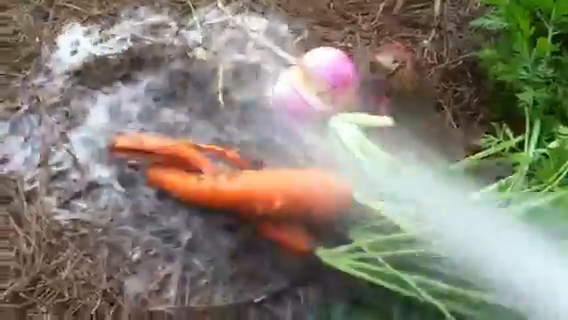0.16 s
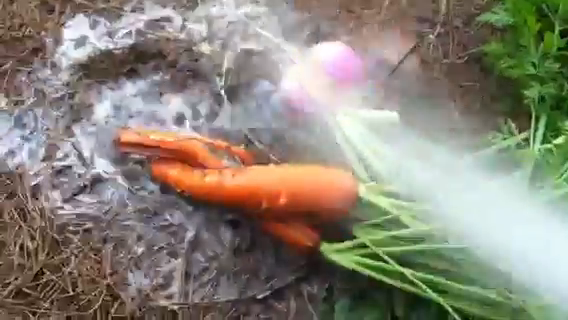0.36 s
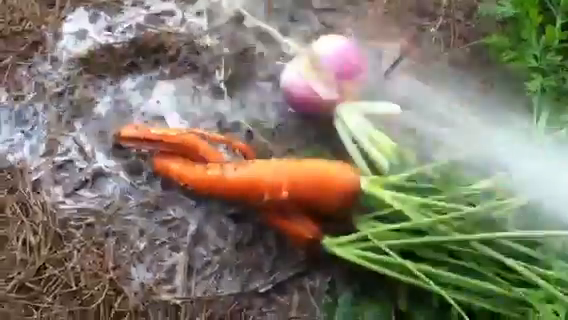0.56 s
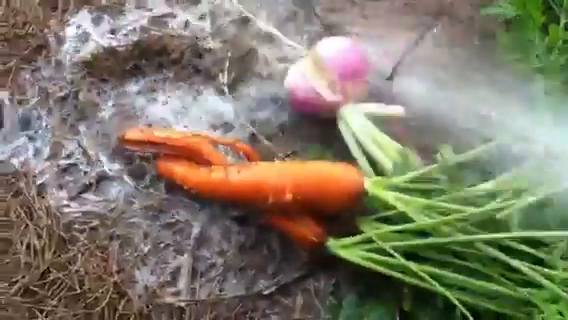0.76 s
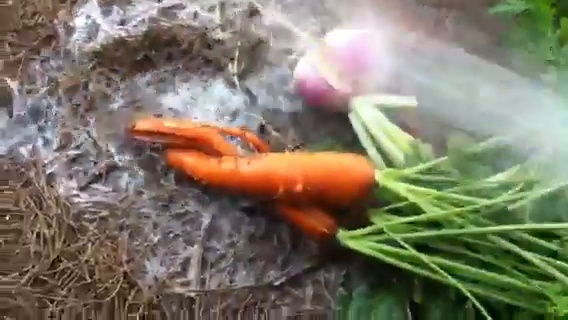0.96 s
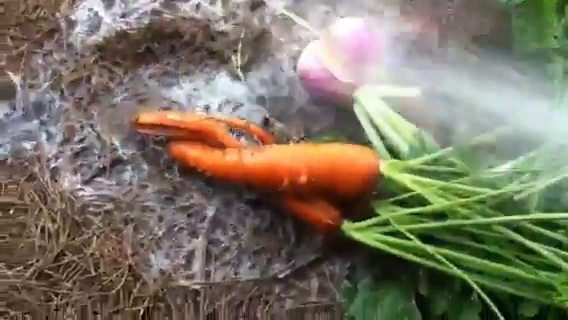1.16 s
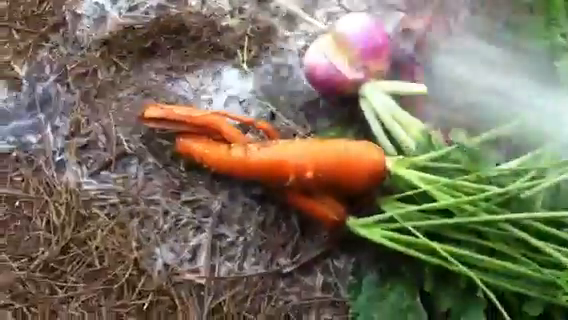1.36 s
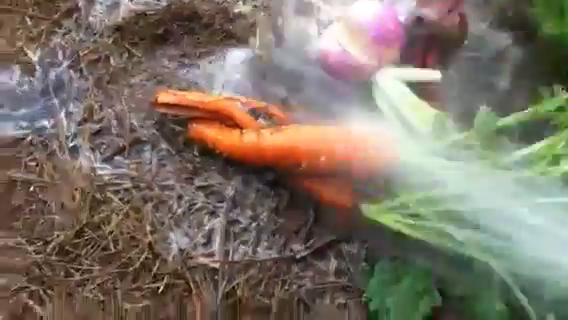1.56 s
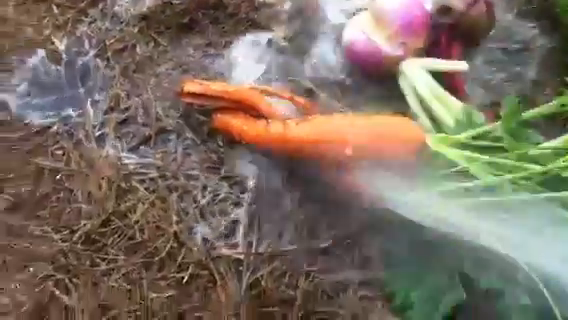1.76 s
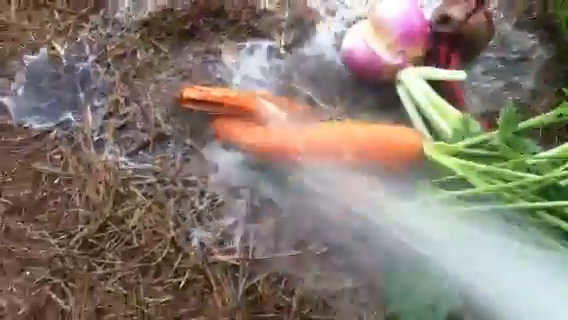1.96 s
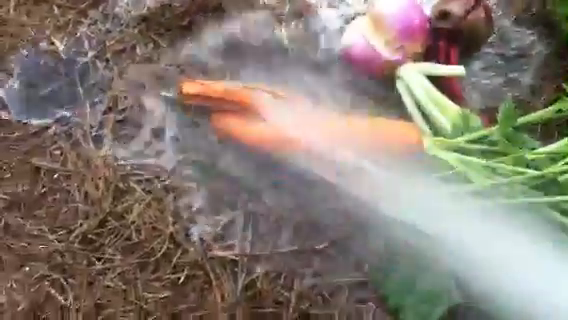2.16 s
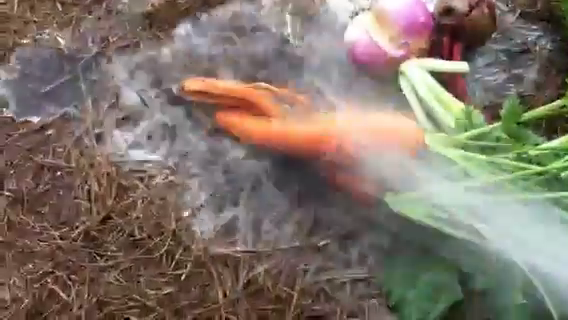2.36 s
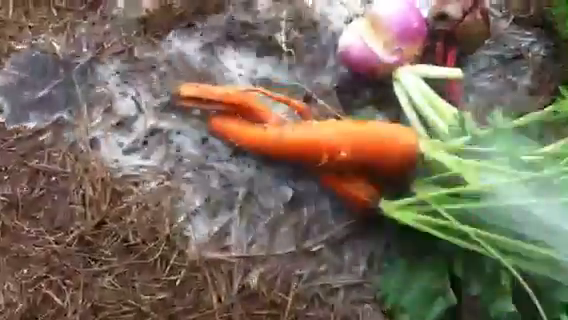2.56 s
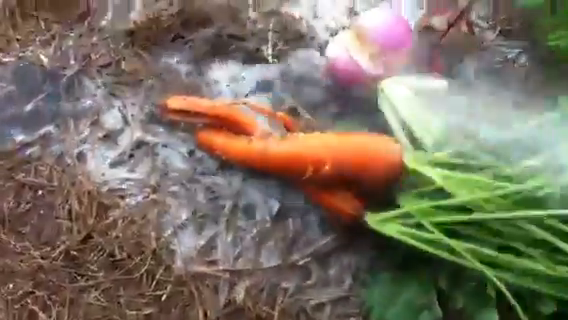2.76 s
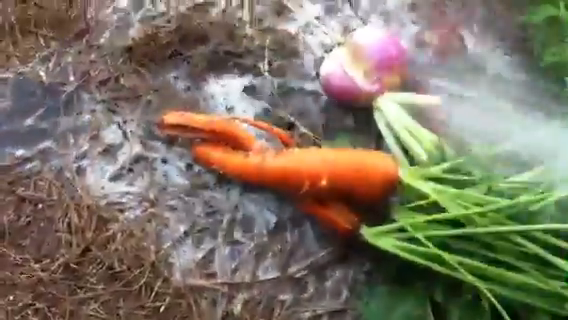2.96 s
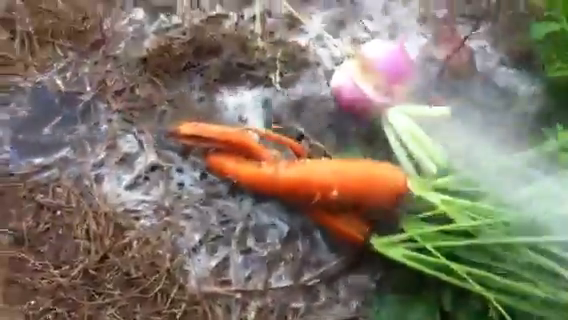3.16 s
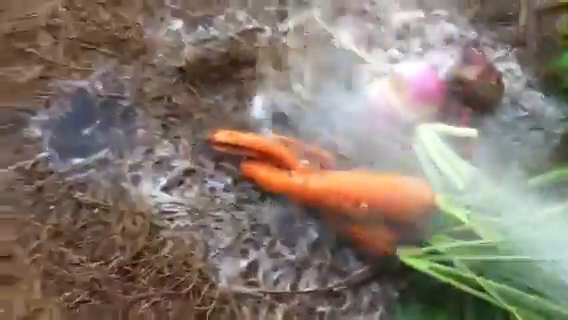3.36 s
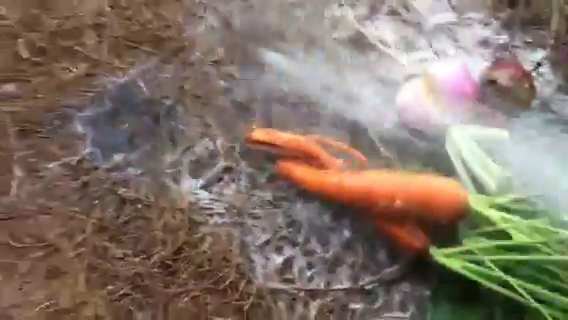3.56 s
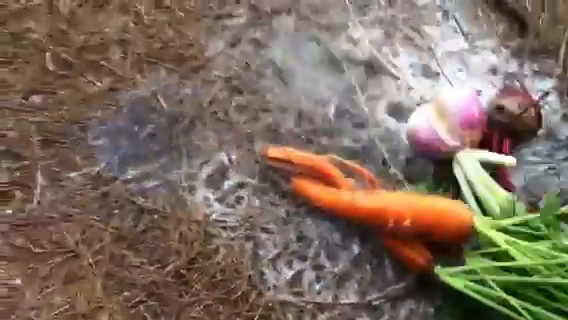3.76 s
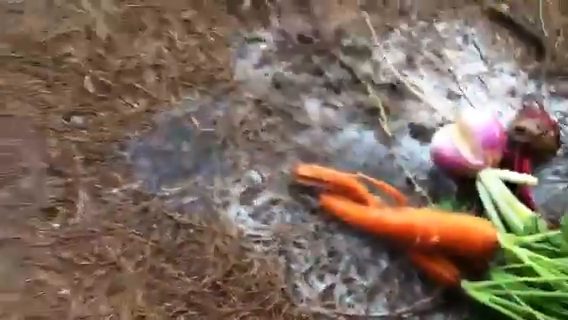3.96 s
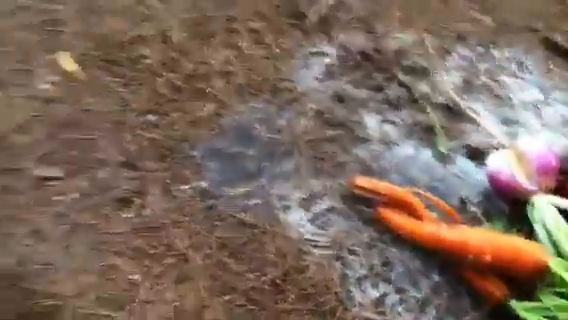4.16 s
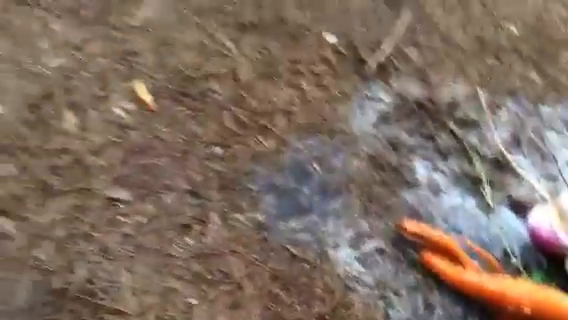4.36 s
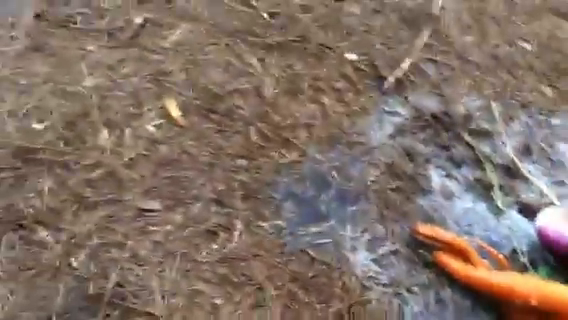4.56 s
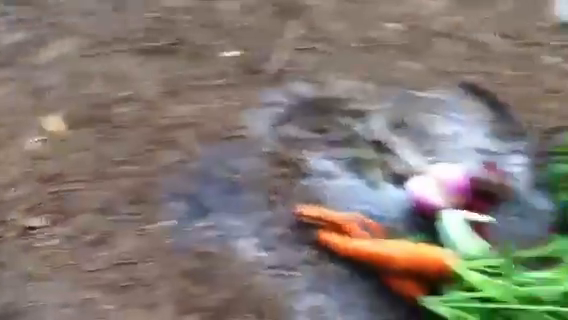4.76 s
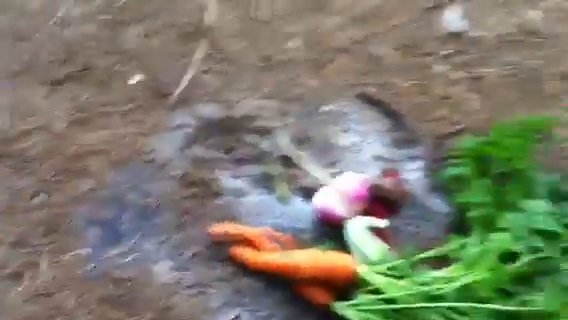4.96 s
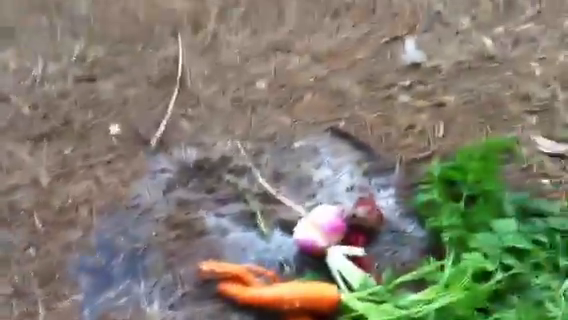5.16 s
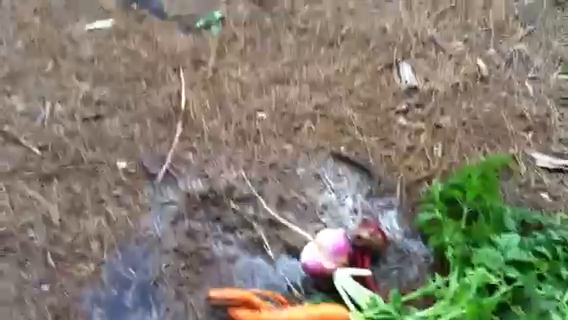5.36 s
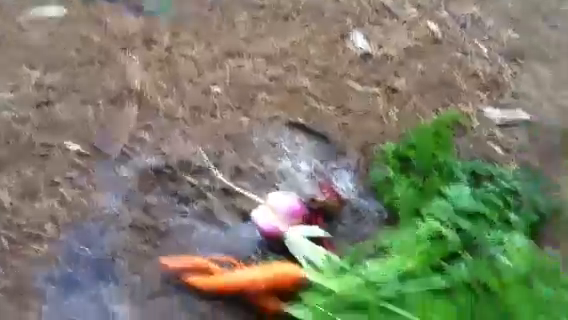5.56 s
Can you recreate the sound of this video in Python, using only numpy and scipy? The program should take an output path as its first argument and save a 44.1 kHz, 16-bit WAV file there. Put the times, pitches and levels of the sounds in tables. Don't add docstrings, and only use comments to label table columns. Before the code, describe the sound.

Loud, crackling water spray sweeps across roots and mud for nearly four seconds, cuts off with a short hoot, leaving faint garden ambience.

```python
import sys
import numpy as np
from scipy import signal
from scipy.fft import rfft, irfft
from scipy.io import wavfile
from scipy.ndimage import uniform_filter1d

SR = 44100
rng = np.random.default_rng(int(sys.argv[2]) if len(sys.argv) > 2 else 0)


def log_audio(samples):
    frames = np.atleast_2d(samples).T
    limited = np.clip(frames, -1, 1)
    pcm = np.round(limited * 32767).astype(np.int16)
    wavfile.write(sys.argv[1], SR, pcm)


def volts_from_decibels(level):
    exponent = np.asarray(level, float) / 20
    return 10 ** exponent


N = 247356


def evened(x):
    return x / np.sqrt(np.mean(x ** 2) + 1e-20)


def along(rows):
    s, *columns = np.transpose(rows)
    return [np.interp(np.arange(N) / SR, s, column) for column in columns]


def ring(colour, size=4096):
    f, db = np.transpose(colour)
    hz = abs(np.fft.fftfreq(size, 1 / SR))
    level_db = np.interp(np.log(hz + 1), np.log(f + 1), db)
    log_gain = np.log(volts_from_decibels(np.maximum(level_db, -90)))
    taps = np.fft.ifft(np.exp(np.conj(signal.hilbert(log_gain)))).real
    return taps / np.linalg.norm(taps)


def coloured(x, colour):
    return evened(signal.oaconvolve(x, ring(colour))[:N])


def resonate(x, hz, width):
    turn = np.exp(2j * np.pi * np.cumsum(hz * np.ones(len(x))) / SR)
    r = np.exp(-np.pi * width / SR)
    return 2 * (turn * signal.lfilter([1 - r], [1, -r], x / turn)).real


def drift(top_hz):
    hz = np.fft.rfftfreq(N, 1 / SR)
    tilt = (hz > 4) / np.sqrt(hz + 1) / (1 + (hz / top_hz) ** 2)
    return evened(irfft(rfft(rng.standard_normal(N)) * tilt, N))


def clicks(per_s, spread_db, length=0.00054):
    lands = rng.random(N) < per_s / SR
    size = np.minimum(rng.exponential(1, N), 3.8)
    power = signal.lfilter([1], [1, -np.exp(-2 / (length * SR))], lands * volts_from_decibels(2 * spread_db * size))
    return evened(rng.standard_normal(N) * np.sqrt(power))


def burst(s, length):
    return np.sin(np.pi * np.clip((np.arange(N) / SR - s) / length, 0, 1)) ** 2


# (time [s], impact force [dB], puddle depth [dB])
SWEEP = [(0, -27.5, 6.5), (.14, -27, 0.5), (.5, -27, -0.5), (.56, -28.5, -2), (.75, -28.5, -2),
         (1.0, -29, -1), (1.38, -30.5, 3), (1.56, -26.5, -0.5), (1.9, -26, -0.5), (2.0, -26, 1),
         (2.35, -26, 1.5), (2.39, -26, -3), (2.55, -29.5, 0.5), (2.9, -29.5, -1), (3.24, -28.5, -1),
         (3.34, -27, 4), (3.56, -28.5, 3), (3.72, -29, 2.5)]
# (time [s], flow [dB])
CLOSING_FLOW = [(3.742, 0), (3.76, -1), (3.8, -4), (3.814, -8.5), (3.83, -18.5), (3.84, -16),
                (3.861, -17.5), (3.874, -41), (3.9, -55)]
# (frequency [Hz], level [dB per Hz])
FIZZ_COLOUR = [(5500, -51), (6800, -15), (7140, -9), (7950, 0.5), (9160, 3), (9950, 1.5), (10900, -7),
               (11600, -6.5), (12700, -2.5), (13500, -8.5), (14500, -14.5), (14950, -23.5), (15300, -25.5),
               (15700, -25), (16000, -74)]
# (frequency [Hz], level [dB per Hz])
HOLLOW_COLOUR = [(380, -50.5), (650, -24.5), (795, -9), (1210, -8.5), (1630, 5), (1930, -5), (2190, -15),
                 (2300, -23), (2990, -42), (5060, -120)]
# (frequency [Hz], level [dB per Hz])
BODY_COLOUR = [(1290, -60), (2200, -23.5), (2430, -9.5), (2660, -11.5), (3160, -6.5), (3490, -7), (3850, 0),
               (4110, -2.5), (4540, 1), (4790, -1.5), (5140, -6), (6300, -3.5), (7200, -9), (9360, -38),
               (15800, -120)]
# (frequency [Hz], level [dB per Hz])
SOIL_COLOUR = [(12, -62.5), (20, -21.5), (27, -35), (59, -34.5), (179, -5), (224, -4), (446, -3),
               (592, -5.5), (720, -0.5), (940, -16), (1580, -120)]
# (clicks [per s], size spread [dB], click share [0-1], share common to all [0-1], clumping [dB])
SPITTING = [
    (2520, 3, 0.84, 0.12, 0.68),
    (893, 3.5, 0.37, 0.6, 0.5),
    (1780, 3, 0.33, 0.04, 0.42),
    (400, 3.5, 0.45, 0.4, 0.76),
]
# (level at usual force [dB], share of force changes [dB/dB],
# share of puddle depth [dB/dB])
ANSWERS = [
    (-28, 1.0, 0.0),
    (-33.5, 0.49, 0.18),
    (-30.5, 0.77, 0.075),
    (-47.5, 1, 1.0),
]
PINCH_CHANGE = [0, -6, 0, 0]


def jet():
    usual_db, pinch_s = -28, 0.016
    force_db, puddle_db = along(SWEEP)
    flow_db = along(CLOSING_FLOW)[0]
    pinched = np.clip((np.arange(N) / SR - CLOSING_FLOW[0][0]) / pinch_s, 0, 1)
    common, surge = clicks(1200, 2.75), drift(250.)
    out = np.zeros(N)
    colours = (FIZZ_COLOUR, HOLLOW_COLOUR, BODY_COLOUR, SOIL_COLOUR)
    for colour, spitting, answer, change_db in zip(colours, SPITTING, ANSWERS, PINCH_CHANGE):
        per_s, spread_db, click_share, common_share, clump_db = spitting
        base_db, force_share, puddle_share = answer
        spit = np.sqrt(1 - common_share) * clicks(per_s, spread_db) + np.sqrt(common_share) * common
        drive = np.sqrt(1 - click_share) * rng.standard_normal(N) + np.sqrt(click_share) * spit
        drive *= volts_from_decibels(clump_db * (1.4 * surge + 0.71 * drift(250.)))
        level_db = base_db + force_share * (force_db - usual_db) + puddle_share * puddle_db
        level_db = level_db + flow_db + change_db * pinched
        out += volts_from_decibels(level_db) * coloured(drive, colour)
    return out


# (frequency [Hz], level [dB rms])
HUM_TONES = [(120, -80), (240, -77), (361, -80)]
# (frequency [Hz], level [dB per Hz])
HISS_COLOUR = [(530, -33), (900, -14.5), (1400, -5), (2000, -6), (2700, -9), (3700, -9), (4800, -5.5),
               (5100, -11.5), (9300, -10), (10700, -16), (12400, -16), (13600, -22), (14500, -25),
               (15700, -36.5)]
# (frequency [Hz], level [dB per Hz])
RUMBLE_COLOUR = [(12, -51), (20, -13), (38, -30), (118, -5.5), (247, -5.5), (318, -9.5), (358, -11),
                 (389, -8), (1100, -11.5), (1430, -41), (2420, -120)]
# (time [s], change [dB])
STIRRING = [(3.9, .5), (4.6, -0.6), (5.1, 0), (5.38, 3), (5.49, -2)]
# (time [s], hiss [dB], rumble [dB])
HAND_SCUFF = [(5.53, -61, -63), (5.545, -55, -58), (5.58, -56, -59), (5.61, -56, -55)]


def garden():
    out = np.zeros(N)
    for hz, db in HUM_TONES:
        out += volts_from_decibels(db) * evened(resonate(rng.standard_normal(N), hz, 3.2))
    hiss = [(s, -59 + db) for s, db in STIRRING]
    hiss += [(s, hiss_db) for s, hiss_db, _ in HAND_SCUFF]
    rumble = [(s, -61.5 + .6 * abs(db)) for s, db in STIRRING]
    rumble += [(s, rumble_db) for s, _, rumble_db in HAND_SCUFF]
    for curve, colour in ((hiss, HISS_COLOUR), (rumble, RUMBLE_COLOUR)):
        patches = rng.standard_normal(N) * volts_from_decibels(0.67 * drift(60.))
        out += volts_from_decibels(along(curve)[0]) * coloured(patches, colour)
    return out


# (time [s], level [dB])
PUDDLE_GULPS = [(.17, -51), (1.1, -49), (1.48, -47), (1.74, -51), (1.96, -47), (2.2, -44), (2.3, -53),
                (3.33, -42), (3.47, -49)]


def splashes():
    hz, width_hz, length_s = 250, 130, .1
    mud = resonate(resonate(rng.standard_normal(N), hz, width_hz), hz, width_hz)
    return evened(mud) * sum(volts_from_decibels(db) * burst(s, length_s) for s, db in PUDDLE_GULPS)


# (time [s], peak level [dB])
BIG_SLUGS = [(0.2482, -8), (0.3226, -8), (0.367, -9), (0.4433, -10), (0.7092, -11), (0.8254, -12),
             (0.8913, -12), (0.9696, -12), (1.1088, -11), (1.2559, -12), (1.4779, -9), (1.5962, -7),
             (1.6191, -10), (1.7139, -9), (1.7693, -10), (1.8486, -11), (1.9329, -9), (2.0052, -8),
             (2.1893, -7), (2.2332, -8), (2.3255, -8), (2.549, -13), (2.989, -11), (3.1052, -6),
             (3.2619, -8), (3.3158, -11), (3.5507, -12)]
# (time [s], peak level [dB])
LAST_DROPS = [(3.7464, -14), (3.7574, -16), (3.7654, -18), (3.7874, -18), (3.7974, -21), (3.8094, -15),
              (3.8164, -26), (3.8374, -25), (3.8494, -29), (3.8584, -30)]


def slugs():
    s, peak_db = np.transpose(BIG_SLUGS + LAST_DROPS)
    out, t = np.zeros(N), np.arange(400) / SR
    grit = uniform_filter1d(rng.standard_normal((len(s), len(t))), size=2)
    crackle = grit * t * np.exp(-t / 0.0002)
    at = ((s + 0.001207) * SR).astype(int)[:, None] + np.arange(len(t))
    fade = np.hanning(2 * len(t))[len(t):]
    for colour, db in ((HOLLOW_COLOUR, -18), (FIZZ_COLOUR, -4), (BODY_COLOUR, -9)):
        rung = signal.fftconvolve(crackle, ring(colour)[None], axes=1)[:, :len(t)]
        gain = volts_from_decibels(peak_db + db) / abs(rung).max(axis=1)
        rung *= gain[:, None] * fade
        out += np.bincount(at.ravel(), rung.ravel(), N)
    return out


# (time [s], length [s], centre [Hz], width [Hz], level [dB])
NOISE_PUFFS = [
    (1.64, .17, 4300, 900, -33),
    (3.72, .09, 1150, 700, -40),
    (3.815, .06, 6300, 1500, -51),
    (.95, .3, 4300, 1200, -38),
    (5.536, .02, 4800, 300, -50),
    (5.536, .016, 6800, 1200, -52),
    (3.3, .4, 1000, 400, -46),
    (3.733, .012, 2050, 350, -31),
    (4.368, .035, 5500, 1800, -60),
    (5.3, .12, 5000, 6000, -60),
]


def puffs():
    out = np.zeros(N)
    for s, length, hz, width, db in NOISE_PUFFS:
        noise = resonate(resonate(rng.standard_normal(N), hz, width), hz, width)
        out += volts_from_decibels(db) * burst(s, length) * evened(noise)
    return out


# (time [s], peak level [dB], pitch [Hz], length [s])
VALVE_HOOT = [(3.7365, -14, 1600, .0055)]


def valve():
    s, peak_db, hz, length = VALVE_HOOT[0]
    t = np.arange(N) / SR - s
    sweep = .9 + 30 * np.clip(t, 0, length)
    return volts_from_decibels(peak_db) * burst(s - .001, length) * np.sin(2 * np.pi * hz * t * sweep)


# (time [s], length [s], pitch [Hz], level [dB])
AIR_POCKETS = [(5.19, .06, 510, -64), (5.28, .04, 540, -57.5), (5.305, .065, 790, -60.5)]
POCKET_RISE = [0, 4000, 2800]


def gurgle():
    out, wobble, broken = np.zeros(N), 1 + .05 * drift(80.), volts_from_decibels(1.5 * drift(60.))
    for (s, length, hz, db), rise in zip(AIR_POCKETS, POCKET_RISE):
        pitch = hz + rise * np.clip(np.arange(N) / SR - s, 0, length)
        whistle = np.sqrt(2) * np.sin(2 * np.pi * np.cumsum(pitch * wobble) / SR)
        out += volts_from_decibels(db) * burst(s, length) * whistle
    return out * broken


# (time [s], peak level [dB], length [s])
NOZZLE_KNOCK = [(5.536, -31, 0.018)]
# (frequency [Hz], width [Hz], level [dB])
NOZZLE_MODES = [(240, 120, -1), (640, 110, 1), (1100, 200, -1), (1700, 120, -3), (2400, 500, -10),
                (3050, 250, -8), (4000, 300, -6), (4800, 160, -4), (6800, 1200, -9), (9500, 2500, -13)]


def knock():
    s, peak_db, length = NOZZLE_KNOCK[0]
    hump = burst(s - .003, length) + volts_from_decibels(-16) * burst(s, .03)
    grit = hump * clicks(6000, .8)
    out = np.zeros(N)
    for hz, width, db in NOZZLE_MODES:
        out += volts_from_decibels(db) * evened(resonate(resonate(grit, hz, width), hz, 3 * width))
    bare = grit
    for _ in range(3):
        bare = resonate(bare, 3200, 6500)
    out += volts_from_decibels(4) * evened(bare)
    return volts_from_decibels(peak_db) * out / abs(out).max()


def scene():
    water = jet() + splashes() + slugs()
    return (water + garden() + puffs() + valve() + gurgle() + knock())[None]


def roll_off(x):
    return signal.sosfilt(signal.butter(12, 15710, fs=SR, output="sos"), x)


def record(dry):
    thin = signal.sosfilt(signal.butter(1, 30., "high", fs=SR, output="sos"), dry)
    return roll_off(thin)


dry = scene()
out = record(dry)
log_audio(out)
```